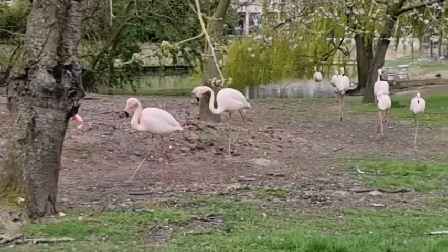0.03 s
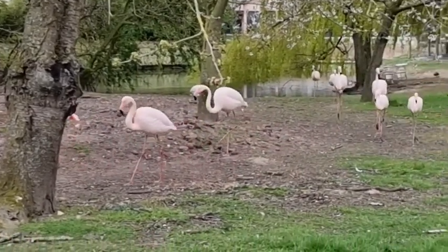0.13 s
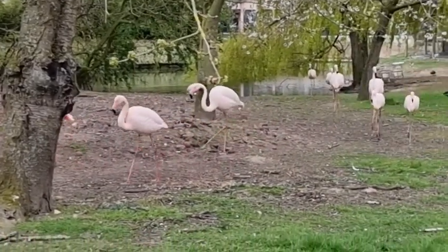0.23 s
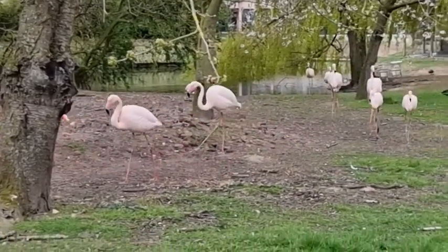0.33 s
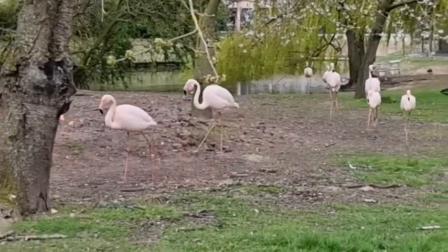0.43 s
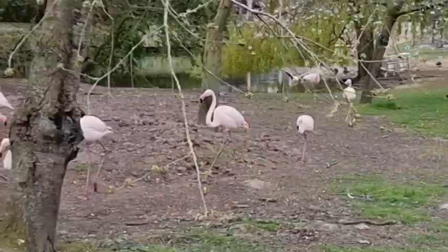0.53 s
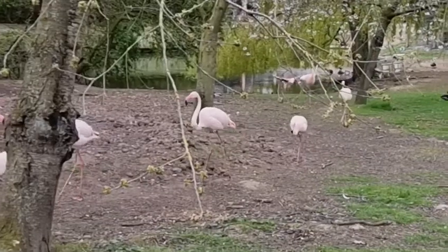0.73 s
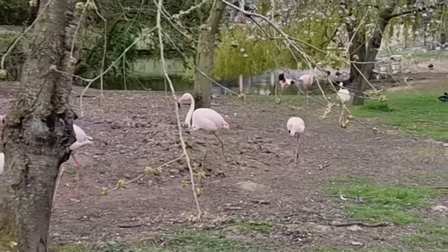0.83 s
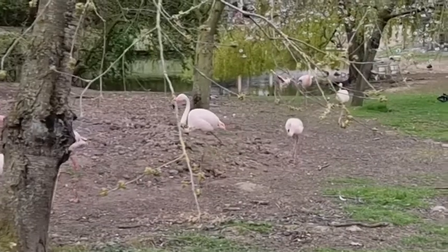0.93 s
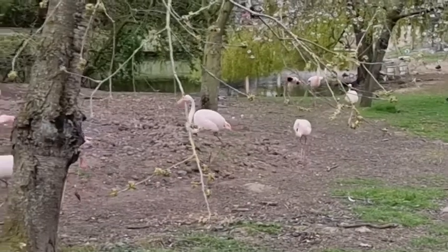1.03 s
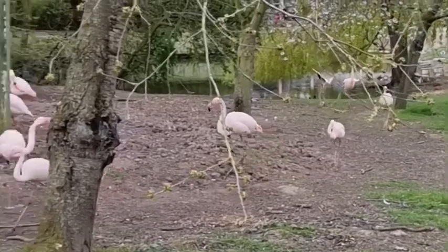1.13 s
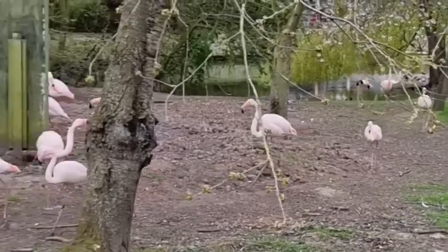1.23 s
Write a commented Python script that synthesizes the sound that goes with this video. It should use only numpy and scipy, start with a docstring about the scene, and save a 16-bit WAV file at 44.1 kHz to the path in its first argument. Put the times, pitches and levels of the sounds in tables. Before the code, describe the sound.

A flamingo gives one harsh double honk while its flock gabbles farther off.

```python
"""Flamingo in an open park

Close to the microphones a flamingo gives a harsh, rattling double honk: ragged puffs from its
syrinx ring through throat, mouth and beak and echo off ground and trunks. Further off the flock
gabbles, a small bird whistles and twigs tick, over low wind and distant hiss.
All sound drops out for a moment just after the honk."""
import sys
import numpy as np
from scipy import signal
from scipy.fft import rfft, irfft
from scipy.io import wavfile
from scipy.ndimage import uniform_filter1d

SR = 44100
rng = np.random.default_rng(int(sys.argv[2]) if len(sys.argv) > 2 else 0)


def log_audio(samples):
    """Write samples as a 16-bit WAV file to the path given in sys.argv[1]."""
    # one column per channel
    frames = np.atleast_2d(samples).T
    # limit to full scale, then quantise
    limited = np.clip(frames, -1, 1)
    pcm = np.round(limited * 32767).astype(np.int16)
    wavfile.write(sys.argv[1], SR, pcm)


N = 57330

# syllables of the near honk: t/s, length/s, pulse rate/Hz, source level/dB, time to crest/s, fade/(dB/s), mouth
# resonance/Hz, beak resonance/Hz, upper resonance/Hz
HONK_SYLLABLES = [(0.2154, .067, 134.5, -25, .026, 345, 1210, 2480, 5080),
                  (.3030, .028, 127.2, -38.5, 0.011, 200, 1200, 2970, 5050),
                  (.3340, .040, 132.4, -23.5, 0.013, 533, 1143, 3020, 4360),
                  (.3790, .038, 140.8, -24, 0.0056, 410, 1730, 2880, 4800)]
# response of the bird's throat: f/Hz, relative level/dB
THROAT_RESPONSE = [(300, -62), (650, -14.5), (900, -14.5), (1080, 2.5), (1650, 0), (2000, -5), (2250, -9),
                   (2650, 9.5), (2950, 2.5), (3400, 4), (4100, 1.5), (4950, 2), (5550, -10), (6200, -9),
                   (7600, -3.5), (8300, -15.5), (9400, -14.5), (10200, -21), (11900, -9.5), (13000, -28.5),
                   (14500, -28), (15700, -28)]
# narrow rings of the honk: f/Hz, width/Hz, gain/dB
HONK_RINGS = [(1129, 23, -1), (2905, 12, 4.5), (4750, 5.3, -5)]
# the honk at the left microphone against the right: f/Hz, level/dB
HONK_BALANCE = [(800, -0.5), (1400, -6), (3000, 1), (5000, -1.5), (6000, -0.5), (7300, -0.5), (9200, 1),
                (11000, 2.5), (12300, -2), (15000, 3)]
# calls of the distant flock: t/s, length/s, resonance/Hz, width/Hz, level/dB, pulse rate/Hz
FLOCK_CALLS = [(.04, 0.17, 1043, 68.5, -56, 145), (.145, 0.11, 3450, 199, -52.5, 150),
               (0.161, 0.17, 793, 80, -54.5, 130.7), (.185, .035, 2940, 530, -45.5, 138.1),
               (0.292, 0.018, 1077, 59.5, -29, 138.9), (.322, 0.025, 1100, 125, -36.5, 143.2),
               (0.496, 0.051, 1327, 49, -41.5, 148.1), (.595, 0.068, 1950, 253, -55.5, 136.3),
               (.60, 0.052, 1480, 350, -46.5, 137.7), (.71, 0.1, 2100, 304, -58.5, 141.8),
               (.78, 0.11, 3234, 40.3, -63, 146.4), (.82, 0.032, 1508, 91, -39, 147.4),
               (.84, 0.057, 2730, 260, -56.5, 142.2), (.85, .07, 857, 201, -50.5, 141.5),
               (.935, 0.0297, 1827, 55, -46, 143.6), (.96, .06, 1406, 230, -43, 135.5),
               (.98, .022, 1502, 50, -34, 151.3), (1.025, .075, 1390, 240, -46.5, 136.1),
               (1.04, 0.049, 1795, 100, -50.5, 143.3), (1.061, .02, 1532, 48.7, -34, 149.2),
               (1.08, .095, 1467, 100, -43, 136), (1.17, 0.036, 2820, 700, -57.5, 126.5),
               (1.185, .03, 1400, 202, -50, 137), (1.235, 0.062, 787, 91, -51.5, 132.7)]
# whistles of the small bird: t/s, length/s, start f/Hz, end f/Hz, level/dB
BIRD_WHISTLES = [(0.538, 0.028, 5210, 4950, -67), (0.741, 0.033, 7050, 6560, -68.5),
                 (0.871, 0.073, 4850, 5050, -71), (0.948, .045, 5250, 5100, -71.5)]
# ticks of twigs: t/s, level/dB, f/Hz, width/Hz
TWIG_TICKS = [(.1365, -68, 6000, 6900), (0.7497, -64, 7880, 5860), (1.2112, -48, 2860, 910)]
# echo of trunks and ground: f/Hz, time to fall 60 dB/s
PARK_DECAY = [(300, 0.46), (1300, 0.56), (3000, 0.36), (6000, 0.28), (14000, 0.19)]
# wind rumble: f/Hz, relative level/dB
WIND_SPECTRUM = [(15, -50), (35, -6), (50, -6.5), (65, 3.5), (80, -4), (105, -7), (133, -10.5), (160, -17),
                 (260, -24.5), (500, -66.5)]
# rise and fall of the wind: t/s, level/dB
WIND_GUSTS = [(0, -51), (.12, -46.5), (.36, -45), (.66, -46.5), (.78, -49), (.9, -48.5), (1.0, -48.5),
              (1.13, -44.5), (1.3, -52.5)]
# distant hiss before the dropout: f/Hz, relative level/dB
DULL_HISS = [(100, 3.5), (300, -5.5), (550, -4.5), (1000, 0.5), (1400, 9.5), (1700, 0.5), (2300, 1),
             (2750, -4), (3100, -16.5), (4000, -19), (4900, -23.5), (5500, -33.5), (8000, -36.5),
             (11000, -56), (16000, -43)]
# distant hiss after the dropout: f/Hz, relative level/dB
OPEN_HISS = [(100, -16), (300, -3), (520, -5), (800, 1.5), (1050, -8), (1320, 7), (1700, -6.5), (2050, -2),
             (2400, -16.5), (2800, -7.5), (3700, -16), (5000, -19), (6000, -24), (8000, -26),
             (10000, -37.5), (12500, -33), (15800, -32)]
# treble of the open hiss: t/s, gain/dB
HISS_TREBLE = [(.5, 4), (.75, 0), (.85, -2), (1.03, -3), (1.15, 2), (1.3, 6)]
# likeness of the open hiss at the two microphones: f/Hz, correlation
HISS_LIKENESS = [(100, -0.24), (290, 0.96), (640, 0.17), (1400, -0.54), (3000, 0.089), (7000, -0.025)]

DROP_FROM_S, DROP_TO_S = .4695, .5092
NEAR_LEAD_S, FAR_LEAD_S = .00021, .00036  # sound reaches the left microphone first


def near_flamingo():
    """The honk from close by, with its narrow rings, ground reflections and park echo."""
    voice = np.zeros((2, N))
    for start, *shape in HONK_SYLLABLES:
        add(voice, start, honk_syllable(*shape))
    voice += sum(amp(db) * resonate(voice, hz, width) for hz, width, db in HONK_RINGS)
    direct = place(voice, NEAR_LEAD_S, read(HONK_BALANCE, np.fft.rfftfreq(N, 1 / SR)))
    t = np.arange(SR // 20) / SR
    ground = flat_noise(len(t)) * np.exp(-t / .011) * (t > .002)
    reflections = signal.fftconvolve(direct, ground / np.linalg.norm(ground[0]), axes=1)[:, :N]
    return direct + amp(-3.5) * reflections + amp(-10.5) * park_echo(direct)


def honk_syllable(length, rate_hz, db, crest_s, fade_db_per_s, mouth_hz, beak_resonance_hz, upper_hz):
    """Each opening of the syrinx lets out a ragged puff, coloured by throat, mouth, beak and an upper
    resonance."""
    puff_s, swell_db_per_s, likeness = .0048, 192, .88
    jitter, shimmer_db, flutter_db = .03, 1.5, 4
    puffs, t = np.zeros((2, SR // 5)), np.arange(SR // 150) / SR
    opening = np.sin(np.pi * np.minimum(t / puff_s, 1) ** .74) ** 2
    for k in range(12):
        late, loud = rng.standard_normal(2)
        flutter = amp(flutter_db * rng.standard_normal(len(t)))
        air = stereo_pair(*np.pad(flat_noise(184), ((0, 0), (0, len(t) - 184))), likeness)
        start = (k + jitter * late) / rate_hz
        if start < length:
            below_crest_db = max(swell_db_per_s * (crest_s - start), fade_db_per_s * (start - crest_s))
            gain = amp(db + shimmer_db * loud - below_crest_db)
            add(puffs, start, gain * unit(opening * flutter * air))
    throat = colour(puffs, THROAT_RESPONSE)
    mouth = amp(1) * resonate(throat, mouth_hz, width_hz=460)
    beak_ring = amp(-3) * resonate(throat, beak_resonance_hz, width_hz=165)
    upper_ring = amp(1) * resonate(throat, upper_hz, width_hz=66)
    return throat + mouth + beak_ring + upper_ring


def flock():
    """Far calls, a little to the left: rough pulse trains of which one resonance carries."""
    rasp, edge_s = .43, .0054
    calls, t = np.zeros(N), np.arange(SR // 5) / SR
    for start, length, hz, width, db, rate_hz in FLOCK_CALLS:
        pulses = np.diff(np.floor(t * rate_hz), prepend=-1)
        voice = (1 - rasp) * unit(pulses) + rasp * rng.standard_normal(len(t))
        for _ in range(3):
            voice = resonate(voice, hz, 2 * width)
        voice = voice[-round(length * SR):]
        age = t[:len(voice)]
        envelope = np.clip(np.minimum(age, length - age) / edge_s, 0, 1)
        add(calls, start, amp(db) * unit(voice * envelope))
    return place(calls, FAR_LEAD_S, pan_db=2.5) + amp(-10.5) * park_echo(calls)


def small_bird():
    """Faint gliding whistles from the trees, more echo than direct sound."""
    whistles = np.zeros(N)
    for start, length, from_hz, to_hz, db in BIRD_WHISTLES:
        progress = np.linspace(0, 1, round(length * SR))
        waver = unit(uniform_filter1d(rng.standard_normal(N), size=120))[:len(progress)]
        hz = (from_hz + (to_hz - from_hz) * np.sqrt(progress)) * (1 + .018 * waver)
        tone = np.sin(2 * np.pi * np.cumsum(hz) / SR)
        add(whistles, start, amp(db) * unit(np.sin(np.pi * progress) * tone))
    return whistles + amp(4.5) * park_echo(whistles)


def twigs():
    """Small dry ticks: snaps of noise through a broad resonance."""
    ticks, t = np.zeros((2, N)), np.arange(SR // 150) / SR
    for start, db, hz, width in TWIG_TICKS:
        snap = rng.standard_normal((2, len(t))) * np.exp(-t / .0033)
        add(ticks, start, amp(db) * unit(resonate(resonate(snap, hz, width), hz, width)))
    return ticks


def park_echo(x):
    """Scattered echoes from the trees, dying sooner in the treble."""
    hz, t, spectra = signal.stft(flat_noise(SR // 2), SR, nperseg=256)
    decay = amp(-60 * t / read(PARK_DECAY, hz)[:, None])
    tail = signal.istft(spectra * decay, SR, nperseg=256)[1]
    tail *= np.minimum(np.arange(tail.shape[1]) / SR / .011, 1)  # builds up over 11 ms
    return signal.fftconvolve(np.atleast_2d(x), tail / np.linalg.norm(tail[0]), axes=1)[:, :N]


def wind():
    """Low rumble, nearly alike at both microphones."""
    rumble = noise(WIND_SPECTRUM, likeness=[(30, .88), (130, .99)])
    return rumble * amp(curve(WIND_GUSTS)) * amp([[-.4], [.4]])


def distant_hiss():
    """The far wash of the park: dull at first, more open after the dropout."""
    dull = noise(DULL_HISS, likeness=[(100, 1), (1500, .72), (6000, .2)])
    before = amp(-43.5) * place(dull, FAR_LEAD_S, pan_db=-2.5)
    after = amp(-47) * noise(OPEN_HISS, HISS_LIKENESS)
    treble = signal.sosfiltfilt(signal.butter(2, 4000, "high", fs=SR, output="sos"), after)
    after += treble * (amp(curve(HISS_TREBLE)) - 1)
    return np.where(np.arange(N) / SR < DROP_FROM_S, before, after)


def amp(db):
    """Decibels to gain."""
    return 10 ** (np.asarray(db) / 20)


def unit(x):
    """Scales to rms 1."""
    return x / np.sqrt(np.mean(x ** 2) + 1e-20)


def read(points, hz):
    """Reads a table on a log-frequency axis."""
    f, value = np.transpose(points)
    return np.interp(np.log(hz + 1), np.log(f), value)


def curve(points):
    """Reads a time curve at every sample."""
    return np.interp(np.arange(N) / SR, *np.transpose(points))


def add(mix, start_s, sound):
    """Mixes a sound in at its start time."""
    part = mix[..., max(round(start_s * SR), 0):][..., :sound.shape[-1]]
    part += sound[..., :part.shape[-1]]


def colour(x, spectrum):
    """Minimum-phase filter with the given spectral shape."""
    size = 4096
    log_gain = np.log(amp(read(spectrum, abs(np.fft.fftfreq(size, 1 / SR)))))
    taps = np.fft.ifft(np.exp(np.conj(signal.hilbert(log_gain)))).real[:size // 2]
    return signal.fftconvolve(x, taps[None] / np.linalg.norm(taps), axes=1)[:, :x.shape[1]]


def resonate(x, hz, width_hz):
    """One resonance with a peak gain near 1."""
    radius = np.exp(-np.pi * width_hz / SR)
    return 2 * signal.lfilter([1 - radius], [1, -radius * np.exp(2j * np.pi * hz / SR)], x).real


def place(x, lead_s, pan_db):
    """The left microphone hears the source lead_s sooner and pan_db louder than the right."""
    left, right = rfft(x * np.ones((2, 1)))
    delay = np.exp(-2j * np.pi * np.fft.rfftfreq(N, 1 / SR) * lead_s)
    return irfft(np.array([left * amp(pan_db / 2), right * delay * amp(-pan_db / 2)]), N)


def stereo_pair(left, other, likeness):
    """Blends two independent noises into channels with the given correlation."""
    return np.array([left, likeness * left + np.sqrt(1 - likeness ** 2) * other])


def noise(spectrum, likeness):
    """Stereo noise with a spectrum and a left-right likeness, both over frequency."""
    hz = np.fft.rfftfreq(N, 1 / SR)
    white = stereo_pair(*rfft(rng.standard_normal((2, N))), read(likeness, hz))
    return unit(irfft(white * amp(read(spectrum, hz)), N))


def flat_noise(size):
    """Two rows of noise with equal energy at every frequency."""
    return unit(irfft(np.exp(2j * np.pi * rng.random((2, size // 2 + 1))), size))


def scene():
    """The park at the microphones; the honk's echo ends inside the dropout."""
    honk_gate = np.arange(N) / SR < DROP_TO_S - .02
    return near_flamingo() * honk_gate + flock() + small_bird() + twigs() + wind() + distant_hiss()


def record(dry):
    """Both channels drop out briefly, and the top treble is cut off."""
    t = np.arange(N) / SR
    live = uniform_filter1d(1. * ((t < DROP_FROM_S) | (t > DROP_TO_S)), size=40)
    lowpass = signal.firwin(511, cutoff=15950, window=("kaiser", 9), fs=SR)
    return signal.oaconvolve(dry * live, lowpass[None], "same")


dry = scene()
out = record(dry)
log_audio(out)
```